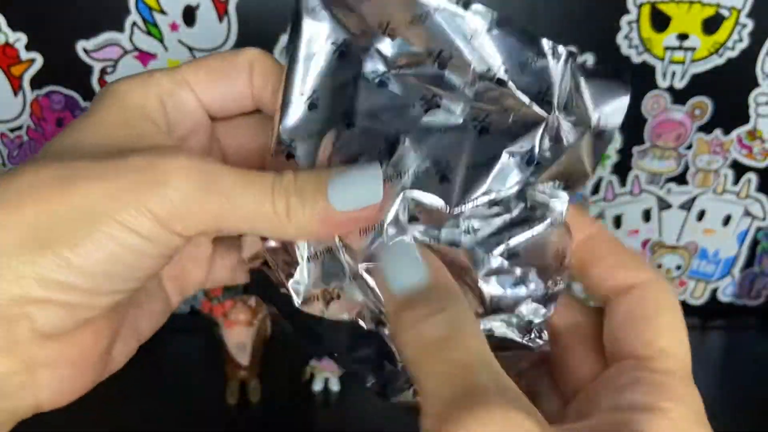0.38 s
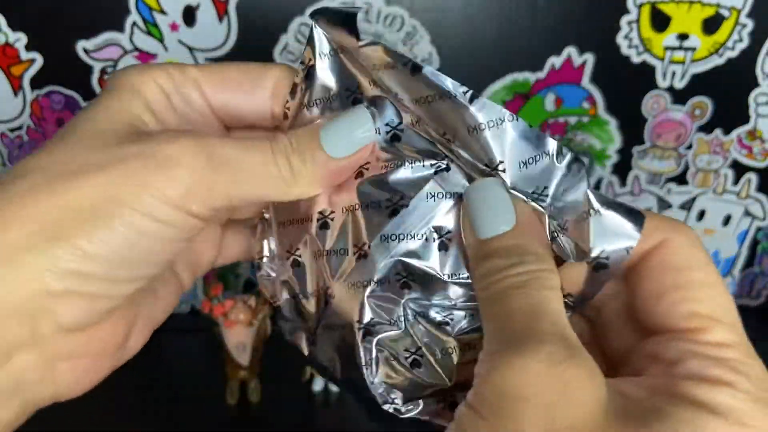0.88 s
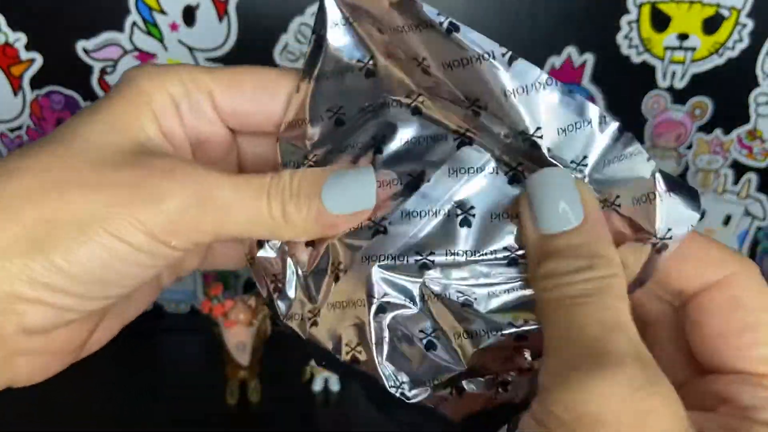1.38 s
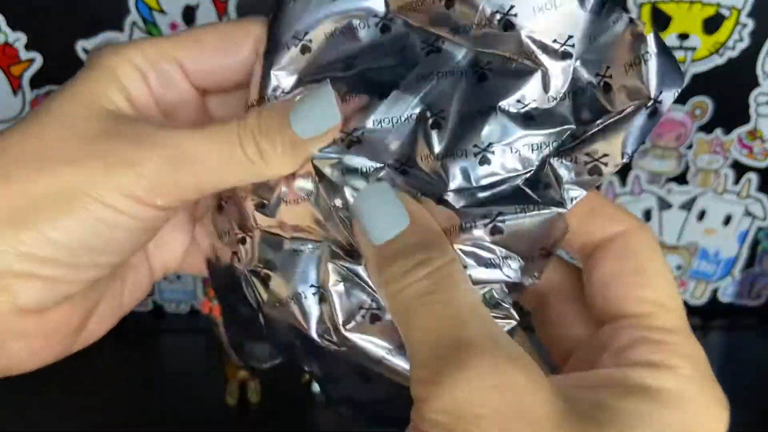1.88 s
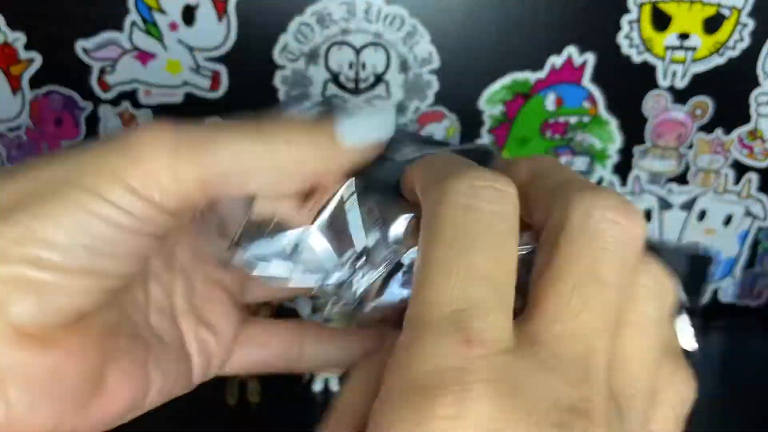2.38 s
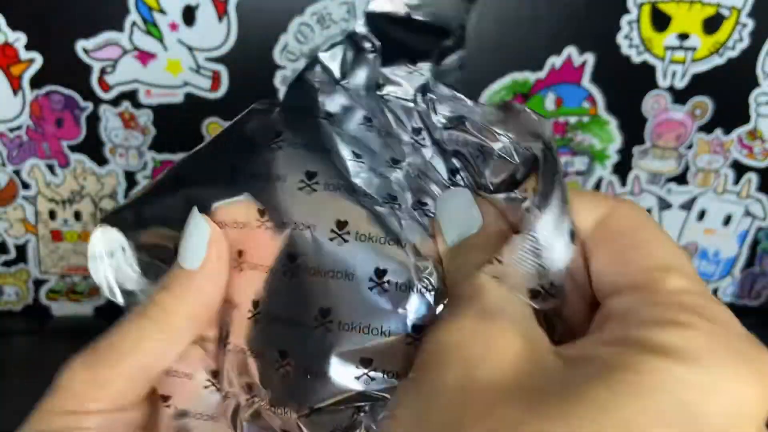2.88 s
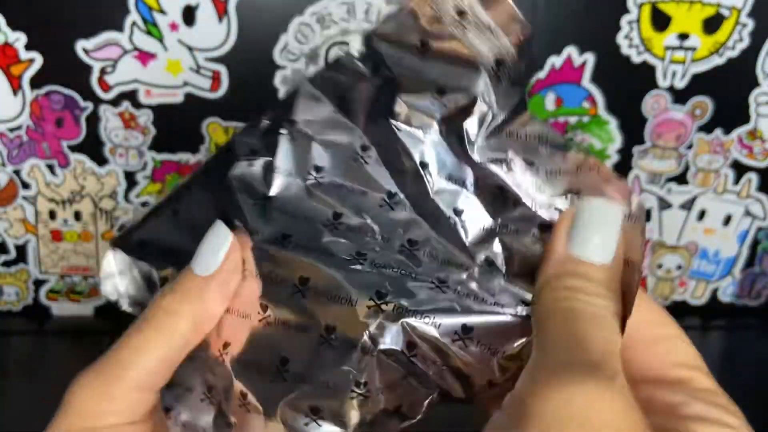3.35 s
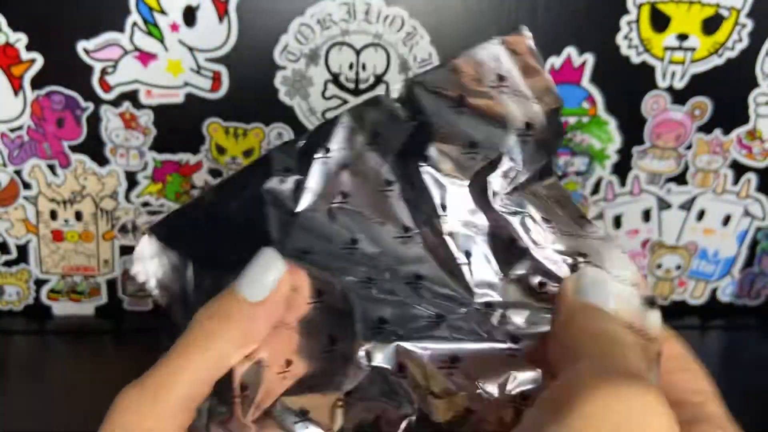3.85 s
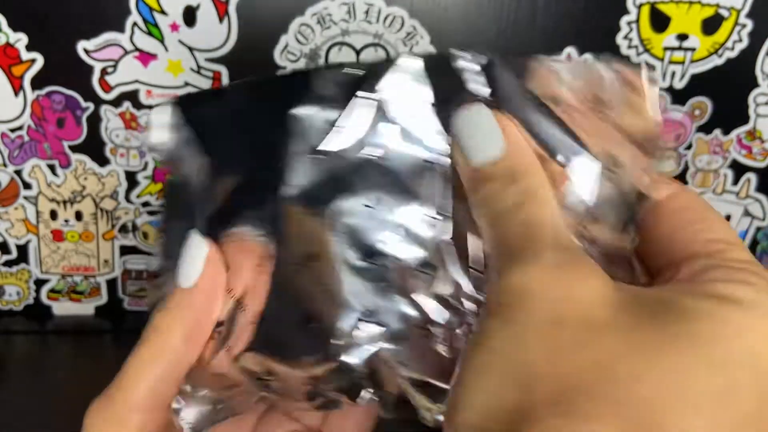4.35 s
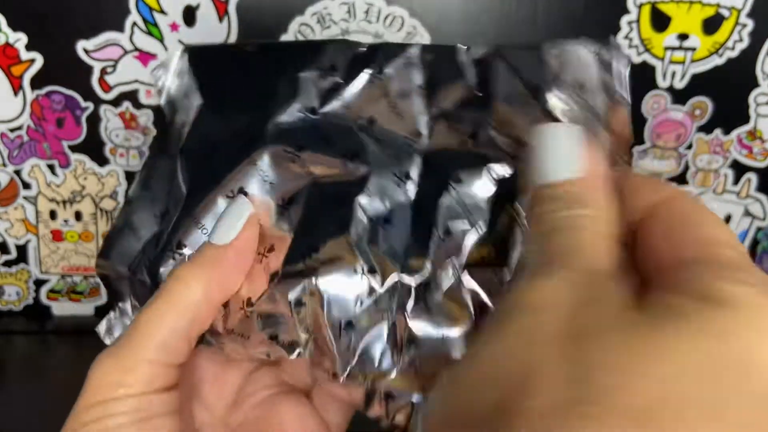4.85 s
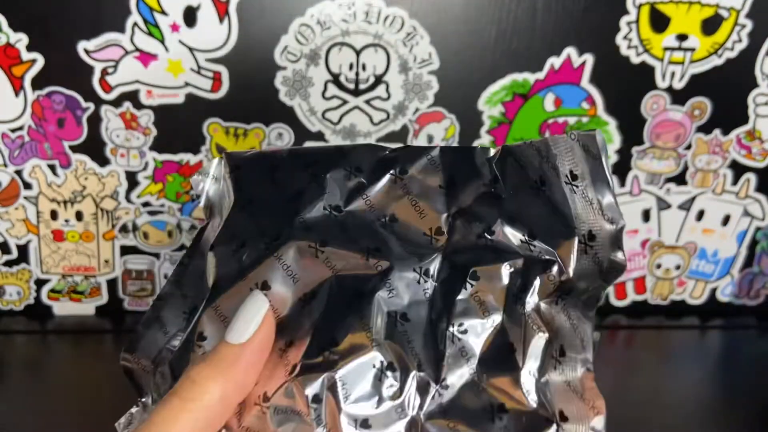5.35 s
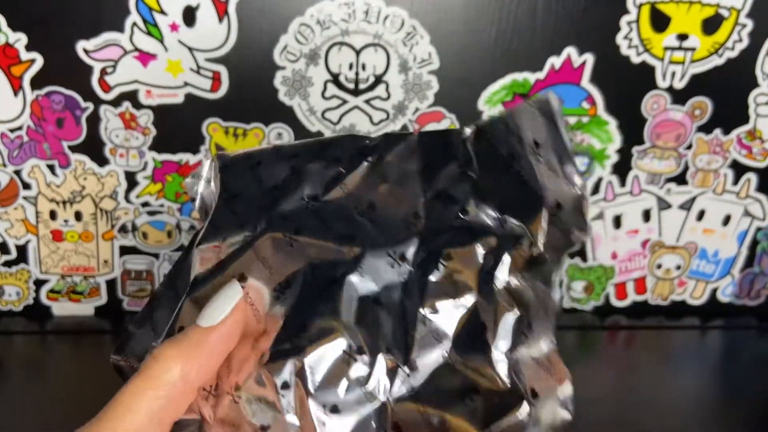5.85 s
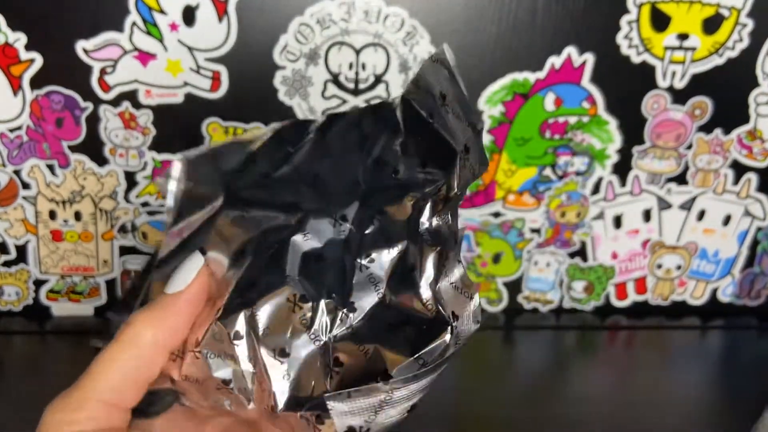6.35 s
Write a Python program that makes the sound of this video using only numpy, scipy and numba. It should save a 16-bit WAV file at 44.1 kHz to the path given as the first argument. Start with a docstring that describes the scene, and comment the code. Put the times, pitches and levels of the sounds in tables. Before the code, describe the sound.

A metallised foil bag is squeezed and crumpled right in front of a phone microphone. Hard, bright snaps ride on dense, sizzling crackle in irregular bursts for about five seconds, with soft dull table bumps underneath. Then the handling stops, leaving isolated ticks and a soft thud over a low room murmur and faint mains hum. The small furnished room adds only a very short echo.

```python
"""Sharp snaps and a dense crackle: two hands crumple a metallised foil bag just in front of a phone.
Each crease is a buckling instability: a noisy crack rings flat facets, pumps the air pocket and sizzles.
Squeezes of the fingers gather hundreds of small creases a second, and bumps excite the table's low modes.
A quiet furnished room adds a short echo, a low murmur and a mains hum."""
import sys
import numpy as np
from scipy import signal
from scipy.fft import rfft, irfft
from scipy.io import wavfile
from numba import njit

SR = 44100
rng = np.random.default_rng(int(sys.argv[2]) if len(sys.argv) > 2 else 0)


def voltage_ratio(decibels):
    """Convert decibels (scalar or array-like) to amplitude ratios, 20 dB per decade."""
    exponent = np.asarray(decibels, float) / 20
    return 10 ** exponent


def put_to_file(sound):
    """Save the sound as 16-bit audio at rate SR, in the file named by the first command-line argument."""
    columns = np.atleast_2d(sound).T  # one column per channel
    safe = np.clip(columns, -1, 1)
    whole_steps = np.round(safe * 32767)
    wavfile.write(sys.argv[1], SR, whole_steps.astype(np.int16))


N = 285768  # length in samples


def colour(x, points):
    """Spectral shaping: multiply the spectrum of x by a curve through (Hz, dB) points; rms 1."""
    hz, db = np.transpose(points)
    f = np.maximum(np.arange(N // 2 + 1) * SR / N, 1)
    gain_db = np.interp(np.log(f), np.log(hz), db, left=-90, right=-90)
    y = irfft(rfft(x) * voltage_ratio(gain_db), N)
    return y / np.std(y)


def bursts(s, db, rise_s, fall_s, shiver_s, shiver_db):
    """Sudden energy release: quick rise, short fall and a second shiver with its own length and level; powers
    add."""
    kicks = np.bincount(np.clip((s * SR).astype(int), 0, N - 1), voltage_ratio(2 * db), N)
    t = np.arange(SR // 8) / SR
    decay = np.exp(-t / fall_s) + voltage_ratio(shiver_db) * np.exp(-t / shiver_s)
    shape = (1 - np.exp(-t / rise_s)) * decay
    power = signal.fftconvolve(kicks, (shape / shape.max()) ** 2)[:N]
    return np.sqrt(np.abs(power))


@njit
def rings(start, hz, t60, size, turn, out):
    """Free decay of a resonator: one damped sine for each event, struck at its start sample."""
    y = np.zeros_like(out)
    for k in range(len(start)):
        p = np.exp(2j * np.pi * hz[k] / SR - np.log(1000.) / (t60[k] * SR))
        z = size[k] * np.exp(1j * turn[k])
        for i in range(start[k], min(start[k] + int(t60[k] * SR), len(y))):
            y[i] += z.imag
            z *= p
    return y


def ring(s, hz, t60, db, turn):
    """Superposition of damped sines: times and t60 in seconds, initial levels in dB, phases in radians."""
    return rings((s * SR).astype(np.int64), 1. * hz, 1. * t60, voltage_ratio(db), 1. * turn, np.zeros(N))


def highpass(x, order, hz):
    """Butterworth high-pass: attenuates x below hz."""
    return signal.sosfilt(signal.butter(order, hz, "high", fs=SR, output="sos"), x)


def lowpass(x, hz):
    """Second-order Butterworth low-pass: attenuates x above hz."""
    return signal.sosfilt(signal.butter(2, hz, fs=SR, output="sos"), x)


def room_air():
    """Diffuse noise, alike at both ports in the bass, with the steady mains hum of an appliance."""
    # spectrum of the murmur; columns: frequency_hz, density_db [dB per Hz, relative]
    murmur_spectrum = [(25, -11), (42, -3), (80, 1.5), (105, -3), (160, -10.5), (188, 3.5), (215, -12),
                       (270, -17.5), (500, -21.5), (1200, -42.5), (16000, -63)]
    murmur_db, hum_db, hum_hz = -51, -58.5, 120
    mid = colour(rng.standard_normal(N), murmur_spectrum)
    side = highpass(colour(rng.standard_normal(N), murmur_spectrum), 1, 250)
    hum = voltage_ratio(hum_db) * np.sqrt(2) * np.sin(2 * np.pi * hum_hz * np.arange(N) / SR)
    return voltage_ratio(murmur_db) * (mid + side * np.array([[1], [-1]])) + hum


def bumps():
    """Modal response: each soft bump excites the table's few low modes, out of step at the two ports."""
    # dull bumps; columns: start_s, level_db, hardness_db [how much the top mode is raised]
    impacts = [(1.373, -33, 5), (1.879, -30.5, 1), (2.465, -20, -9), (2.501, -29, -27), (2.71, -20, -10.5),
               (2.76, -22, -14), (3.245, -25, -6.5), (3.868, -29, -1.5), (4.641, -38, 16.5),
               (4.987, -30, -6), (5.545, -31.5, 14.5), (5.721, -40.5, 17), (5.748, -24.5, -12)]
    # modes of the table; columns: frequency_hz, level_db, t60_s
    modes = [(86, -10.5, 0.23), (129, -4, 0.14), (189.6, -7, 0.13)]
    s, db, hard_db = np.transpose(impacts)
    skew = 0.25 * rng.standard_normal((len(s), len(modes))).T
    ports = []
    for side in (1, -1):
        port = np.zeros(N)
        for k, (hz, mode_db, t60) in enumerate(modes):
            level_db = db + mode_db + hard_db * k / 2 + side * .7
            port += ring(s, hz + 0 * s, t60 + 0 * s, level_db, side * skew[k] / 2)
        ports.append(port)
    # a padded contact pushes for a few milliseconds
    return lowpass(np.array(ports), 260)


def handling(s):
    """Power addition: crackle level and mean sizzle at times s, from squeezes plus the held bag."""
    # squeezes of the fingers, each a spell of small creases; columns: start_s [full strength], hold_s,
    # crackle_db, sizzle_db [duller ones pump more air]
    squeezes = [(0.01, 0.039, -31.5, -14.5), (0.164, 0.056, -26, -6), (0.324, 0.067, -26.5, -8.5),
                (0.558, 0.068, -25.5, -2.5), (.68, 0.028, -31.5, 0.5), (.745, 0.12, -25.5, -5.5),
                (0.893, .04, -42, -6), (1.023, 0.029, -24, -7), (1.16, 0.12, -26, -5.5),
                (1.374, 0.17, -23, -6), (1.587, 0.079, -25.5, -5.5), (1.716, 0.034, -28.5, -4),
                (1.76, .24, -21.5, -4), (2.055, 0.069, -31, -5), (2.236, 0.066, -32.5, -7.5),
                (2.368, .12, -25, -6.5), (2.685, .095, -19, -4), (2.8, .065, -25.5, -5),
                (2.923, 0.044, -24, -9), (3.011, 0.09, -24.5, -4.5), (3.155, .05, -29, -1.5),
                (3.215, 0.064, -19.5, -5), (3.395, 0.031, -33.5, -5.5), (3.688, 0.19, -28, -7),
                (4.018, .09, -23, -5.5), (4.13, 0.13, -32, -5.5), (4.294, 0.085, -28.5, -5),
                (4.577, 0.074, -22, -6), (4.717, .13, -30.5, -3), (4.966, 0.015, -37.5, -9),
                (5.392, 0.036, -55, -15), (5.541, 0.011, -48, -18), (5.597, 0.18, -46, -17),
                (6.282, 0.069, -62, -1), (6.485, .02, -43.5, -0.5)]
    # faint creasing while the bag is merely held; columns: time_s, crackle_db
    holding = [(0, -44), (2.0, -45), (2.2, -62), (2.6, -45), (3.8, -45), (3.93, -60), (3.99, -60),
               (4.2, -43.5), (4.85, -43), (5.15, -65), (5.8, -75), (6.0, -73), (6.24, -77), (6.48, -68)]
    holding_sizzle_db = -13
    # a squeeze swells, tires while held, dies away
    grip_db_per_s, sag_db_per_s, let_go_db_per_s = 508.5, 19.5, 268
    start, hold, db, sizzle_db = np.transpose(squeezes)[:, :, None]
    since = s - start
    swell_db = grip_db_per_s * np.maximum(-since, 0)
    sag_db = sag_db_per_s * np.clip(since, 0, hold)
    let_go_db = let_go_db_per_s * np.maximum(since - hold, 0)
    power = voltage_ratio(2 * (db - swell_db - sag_db - let_go_db))
    held = voltage_ratio(2 * np.interp(s, *np.transpose(holding)))
    total = power.sum(axis=0) + held
    mean_sizzle_db = ((power * sizzle_db).sum(axis=0) + held * holding_sizzle_db) / total
    return 10 * np.log10(total), mean_sizzle_db


def creases(s, db, hz, pocket_db, sizzle_db, facet_db, fall_s):
    """Buckling instability: stored strain cracks in uneven steps, rings facets, puffs air and sizzles."""
    # colour of a buckling crease; columns: frequency_hz, density_db [dB per Hz, relative]
    foil_spectrum = [(550, 4), (1000, 2.5), (3000, 10.5), (6500, 9), (7300, -20.5)]
    # colour of the treble sizzle; columns: frequency_hz, density_db [dB per Hz, relative]
    sizzle_spectrum = [(5500, -16.5), (7000, 0), (15700, -5.5), (15900, -35)]
    neighbour_db = -13.  # relative to the crease's own facet
    dull_shiver_db, sharp_shiver_db = -4., -5.  # shiver after the crack
    chance = rng.random((len(s), 19)).T
    shared = colour(rng.standard_normal(N), foil_spectrum)
    pocket_hz = 270 * 2.75 ** chance[0:2]
    other_hz = 1200 * 5.5 ** chance[2:6]
    pan_db = 3.54 + 6 * (chance[6] - .5)
    # the strained crease creaks just before it gives, and settles with two aftershocks
    creak_s = s - .002 - 0.0067 * chance[7]
    aftershock_s = s + 0.0012 + 0.0198 * chance[8:10]
    step_s = np.concatenate([s, creak_s, *aftershock_s])
    step_db = np.concatenate([0 * s, -12 - 14 * chance[10], *(-9 - 14 * chance[11:13])])
    small_db, sharp_db = np.tile(np.log2(hz / 2000), 4), np.tile(sizzle_db, 4)
    facet_t60 = 16 * (.5 + chance[14]) / hz + 0.0028
    sides = []
    for side in (1, -1):
        near_db = db + side * pan_db / 2
        # each port faces other facets, so only part of the crack is common
        crack = shared + 1.05 * colour(rng.standard_normal(N), foil_spectrum)
        dull = lowpass(crack, 2200)
        crack_db = np.tile(near_db, 4) + step_db - 12
        # small facets crack thinner; the sharper the crease, the more of its upper crack
        dull_db, upper_db = crack_db - 2.3 * small_db, crack_db + .4 * sharp_db
        sound = dull * bursts(step_s, dull_db, 0.00015, fall_s, 0.019, dull_shiver_db)
        sound += (crack - dull) * bursts(step_s, upper_db, 0.00014, fall_s, 0.0099, sharp_shiver_db)
        skew = side * 2.0 * (chance[13] - .5)
        sound += ring(s, hz, facet_t60, near_db + facet_db, skew)
        # neighbouring facets are set ringing a moment later
        for k, near_hz in enumerate(other_hz):
            later_s = s + .005 * chance[15 + k]
            level_db = near_db + facet_db + neighbour_db
            sound += ring(later_s, near_hz, 30 / near_hz + 0.023, level_db, skew * 1.56)
        # the air pocket puffs twice
        for k, puff_hz in enumerate(pocket_hz):
            puff_s = s + 0.00618 * k * chance[14]
            puff_t60 = 4.55 * (.5 + chance[7]) / puff_hz
            puff_db = near_db + pocket_db - 4.5 + 2.6 * np.log2(puff_hz / 400)
            sound += ring(puff_s, puff_hz, puff_t60, puff_db, skew * 0.84)
        sides.append(sound)
    treble_db = np.tile(db, 4) + step_db + sharp_db - 6.5
    sizzle_env = bursts(step_s, treble_db, 0.00042, fall_s, shiver_s=0.0024, shiver_db=1)
    common, *own = (colour(rng.standard_normal(N), sizzle_spectrum) for _ in range(3))
    return np.array(sides), (common + 0.1 * np.array(own)) * sizzle_env


def crackle():
    """Random point process: hundreds of small creases a second, few large and many faint."""
    chance = rng.random((int(900 * N / SR), 5))
    db, sizzle_db = handling(chance[:, 0] * N / SR)
    # the harder the squeeze, the more creases buckle and the more alike they are
    buckles = chance[:, 4] < np.clip(.45 + .045 * (db + 28), .5, 1)
    chance, db, sizzle_db = chance[buckles].T, db[buckles], sizzle_db[buckles]
    spread_db = np.clip(23.5 - 0.59 * (db + 30.5), 12, 25)
    size_db = db + 0.66 * spread_db - spread_db * chance[1] ** 0.35
    # dull creases belong to large facets, which ring lower
    facet_hz = 900 * np.clip(7.5 + 0.363 * sizzle_db, 1.5, 8) ** chance[2]
    pocket_db = -8.5 - 0.96 * sizzle_db
    # every crease has its own sharpness
    sharp_db = sizzle_db + 16 * (chance[3] - .5)
    return creases(chance[0] * N / SR, size_db, facet_hz, pocket_db, sharp_db, facet_db=-1.5, fall_s=0.0024)


def snaps():
    """Separate buckling events: single creases, from loud snaps to faint ticks in the pauses."""
    # single creases; columns: start_s, level_db, facet_hz, pocket_db [air pocket], sizzle_db
    # (pocket and sizzle relative to the crease's level)
    single_creases = [(0.022, -11, 2400, -24, -3.5), (0.042, -8.5, 1890, -29, -2),
                      (0.074, -12, 2150, -3.5, -1.5), (.102, -28.5, 5900, -23, 18),
                      (0.15, -16.5, 3380, -15, -11.5), (.181, -12, 1580, -9, -2.5),
                      (.187, -4, 1760, -10, -8.5), (.211, -19.5, 1580, -16, 8),
                      (.253, -13.5, 1710, -10, -1), (.299, -16.5, 1180, -9.5, 2.5),
                      (.353, -15, 1100, -22, 6.5), (0.365, -5, 5150, -14, -12), (0.397, -13, 4410, -4.5, 1),
                      (.479, -14, 1100, -27, -11), (0.55, -23.5, 6370, 9.5, -3),
                      (.571, -12, 5230, -24.5, -1), (.611, -12.5, 5160, -3, 5.5),
                      (.629, -12, 1120, -14.5, -14), (.65, -9, 2960, -11, -14),
                      (.755, -12, 2600, -29.5, 3.5), (.809, -12, 1020, -25.5, -11),
                      (0.835, -3, 3600, -18, -11), (.851, -6.5, 1550, -35, -4), (.915, -28.5, 6000, 8, 10),
                      (0.972, -12.5, 3040, -4.5, -6), (1.022, -13, 1090, -0.5, 1.5),
                      (1.06, -7, 3060, -2.5, -2), (1.124, -18.5, 1460, 0, -2),
                      (1.146, -15.5, 6240, -20, -5), (1.207, -13.5, 5120, 0, 0.5),
                      (1.222, -16.5, 2640, 3.5, 7), (1.244, -6, 4730, -15.5, -14),
                      (1.306, -10, 5170, -5, -6), (1.365, -5.5, 970, -17, -5.5), (1.376, -10, 2570, 9, 4.5),
                      (1.413, -24.5, 3660, -13.5, 14.5), (1.431, -16.5, 4400, 6, 9),
                      (1.457, -16, 6900, -13, 3.5), (1.478, -13.5, 1900, -4.5, 3),
                      (1.589, -20, 1480, 1, 4.5), (1.607, -5, 5130, -10.5, -3), (1.672, -15, 3230, -8, 8),
                      (1.763, -14, 1780, -7, 6), (1.776, -6.5, 1610, -13, -3), (1.796, -21, 4570, 4, 5),
                      (1.831, -9.5, 2730, -2.5, 2), (1.869, -8.5, 1420, -16.5, 0),
                      (1.894, -7, 1050, -24, -6), (1.955, -15, 3400, 2, 1), (1.977, -10, 1330, -7.5, -17),
                      (2.056, -15, 2060, -12, -35), (2.078, -13.5, 1140, -19, -9.5),
                      (2.104, -8, 3400, -35, -8), (2.158, -23.5, 6480, -30, 0), (2.271, -9, 1920, -14, -6),
                      (2.301, -20, 1840, -28, 9), (2.317, -17.5, 2750, -29, -6),
                      (2.39, -5.5, 4500, -23, -2.5), (2.422, -11, 1420, -12.5, -1.5),
                      (2.444, -21, 1190, -8, 5.5), (2.497, -16.5, 1230, 3, -6), (2.525, -16, 4970, -13, -5),
                      (2.579, -27, 1206, -2, -2), (2.642, -28.5, 5790, -9, 8), (2.666, -22, 3630, 8, 4),
                      (2.685, -28.5, 3760, -7, 4.5), (2.71, -10, 2060, -9.5, -10.5),
                      (2.751, -7, 1900, -3, -6.5), (2.77, -9, 4230, -0.5, 0.5),
                      (2.786, -15, 4500, -17, -0.5), (2.834, -5, 2900, -6.5, -7),
                      (2.852, -6, 5300, -4.5, -2.5), (2.913, -15, 5100, -9, -0.5),
                      (2.959, -12.5, 4540, -9.5, 3), (2.978, -11, 4870, -6, -6.5),
                      (3.024, -16.5, 5450, 0, 3.5), (3.055, -10.5, 5150, -1.5, 1),
                      (3.092, -17, 2530, 5, 9.5), (3.109, -16.5, 3160, -27.5, 4.5),
                      (3.175, -17.5, 1820, 4, -1.5), (3.218, -10, 2430, -15.5, 0), (3.236, -7, 5700, -5, 0),
                      (3.264, -8, 3570, -25, -7.5), (3.28, -26.5, 2960, -17, -9),
                      (3.352, -32, 3040, -2, 7.5), (3.42, -18, 1980, 1, 0), (3.459, -21.5, 6300, -1, 3.5),
                      (3.5, -33.5, 1480, -16, 2.5), (3.53, -24, 4520, -16, -2.5),
                      (3.579, -14, 1690, -8, -1), (3.612, -12.5, 1110, -6, 1.5),
                      (3.645, -21.5, 1200, -4, -3), (3.691, -18, 1230, 4.5, 7),
                      (3.725, -12.5, 4370, -29, -5), (3.773, -17, 2400, -11.5, 3.5),
                      (3.8, -12, 5370, -25.5, -0.5), (3.808, -8.5, 4900, -7.5, -6.5),
                      (3.87, -13.5, 1460, 7, 0), (4.033, -14, 3300, -4, 0.5),
                      (4.052, -5.5, 4500, -20.5, -1), (4.093, -10, 2820, -8.5, 3),
                      (4.155, -19, 5450, -10.5, 6), (4.167, -7.5, 3100, -5.5, -5.5),
                      (4.229, -15, 4470, -14.5, -7.5), (4.297, -20, 6440, -7, 3.5),
                      (4.348, -22, 2610, 3.5, 7.5), (4.435, -24, 3260, 4.5, 10),
                      (4.481, -21.5, 4670, -0.5, 9.5), (4.574, -18, 6370, -16.5, 7.5),
                      (4.589, -11.5, 5400, -4, -5), (4.631, -20.5, 1450, -9, 8.5),
                      (4.645, -2.5, 3200, 0, -9.5), (4.703, -19.5, 1650, -28, 7),
                      (4.719, -12.5, 1610, -3, -1), (4.746, -11.5, 1100, 1, -8),
                      (4.816, -14.5, 4960, -0.5, 2), (4.909, -20.5, 3400, -19, 0.5),
                      (4.963, -7.5, 1680, -13.5, -6), (5.03, -27, 1160, -19, -15),
                      (5.106, -34, 1490, -16, -4), (5.185, -40.5, 1540, 1, -9),
                      (5.272, -42.5, 2500, -7, -19), (5.281, -38, 3190, -3, -19),
                      (5.317, -41, 4500, -10, 0.5), (5.346, -38.5, 995, -3, -16),
                      (5.383, -20.5, 1900, -19, -5.5), (5.401, -23.5, 1550, -13, -12),
                      (5.413, -30.5, 950, 0, -5.5), (5.524, -41.5, 3040, -3, 1),
                      (5.543, -25, 780, 12.5, -19), (5.612, -33.5, 890, -3, -0.5), (5.64, -42, 700, 10, -9),
                      (5.714, -42, 810, 23, -9), (5.756, -43, 1105, 0, -3), (5.778, -40.5, 1940, -13, -7),
                      (5.84, -47.5, 3130, 0, 0), (5.911, -40.5, 877, -13, -15), (6.128, -51, 1003, 10, -8),
                      (6.275, -32, 4470, -29.5, 13), (6.359, -49, 4600, 0, 4), (6.4, -51, 890, 11, -16),
                      (6.426, -45, 6000, 3, 8.5), (6.473, -29, 1650, 1, -19)]
    return creases(*np.transpose(single_creases), facet_db=-3., fall_s=0.0036)


def room_echo(x):
    """Exponential reverberant decay: convolves each channel with its own fading noise."""
    t60_s, echo_db, gap_s = 0.11, -21, .006
    t = np.arange(SR // 2) / SR
    echo = rng.standard_normal((4, len(t))) * voltage_ratio(-60 * t / t60_s) * (t > gap_s)
    echo = voltage_ratio(echo_db) * echo / np.sqrt(np.sum(echo ** 2, axis=1, keepdims=True))
    return signal.fftconvolve(x, echo, axes=1)[:, :N]


def advance_treble(treble):
    """Phase shift in the frequency domain: a time lead between microphone ports and a constant phase lag."""
    lead_s, lag_rad = .0002313, .52
    turn = 2 * np.pi * lead_s * np.arange(N // 2 + 1) * SR / N - lag_rad
    return irfft(rfft(treble) * np.exp(1j * turn), N)


def scene():
    """Linear superposition: foil close to the phone, its short echo, the table and the background."""
    body, sizzle = snaps()
    small_body, small_sizzle = crackle()
    # a bag this small radiates no deep bass
    band = signal.butter(4, [190, 7400], "band", fs=SR, output="sos")
    body = signal.sosfilt(band, body + small_body)
    foil = np.vstack([body, sizzle + small_sizzle])
    left, right, treble_left, treble_right = foil + room_echo(foil)
    # the treble sounds slightly earlier in the right channel, and with opposite sign
    early = advance_treble(treble_right)
    return np.array([left + treble_left, right - early]) + bumps() + room_air()


def band_limit(x):
    """A steep low-pass at the top of the band."""
    return signal.sosfilt(signal.butter(12, 16970, fs=SR, output="sos"), x)


def record(dry):
    """High-pass filtering and soft saturation: the phone cuts the deepest bass and rounds loud peaks."""
    dry = highpass(dry, 3, 42)
    mix = np.tanh(0.83 * dry) / 0.8
    return band_limit(mix)


dry = scene()
out = record(dry)
put_to_file(out)
```